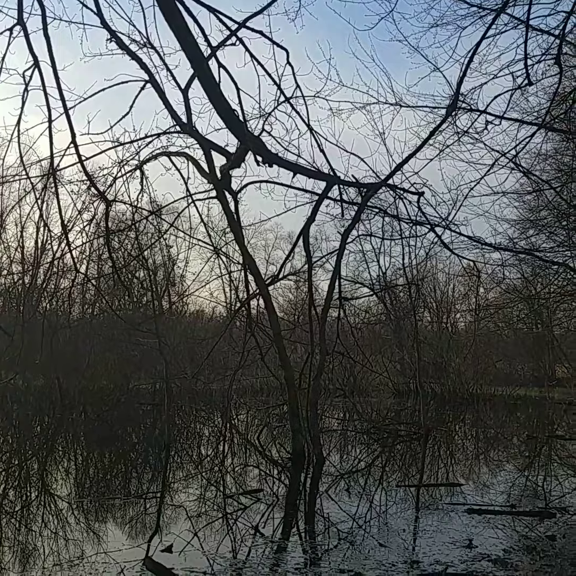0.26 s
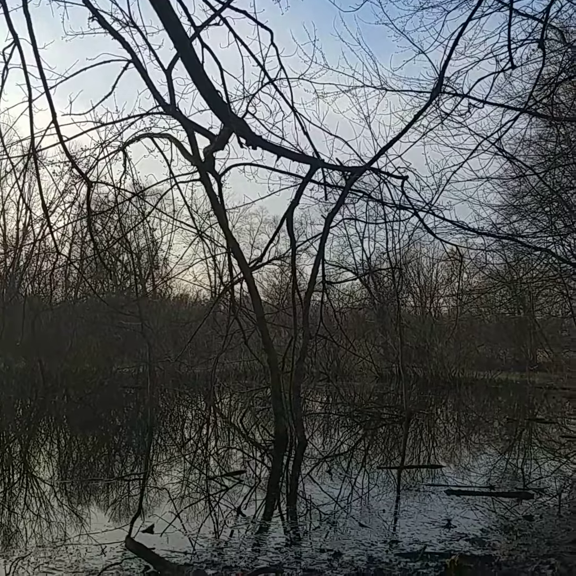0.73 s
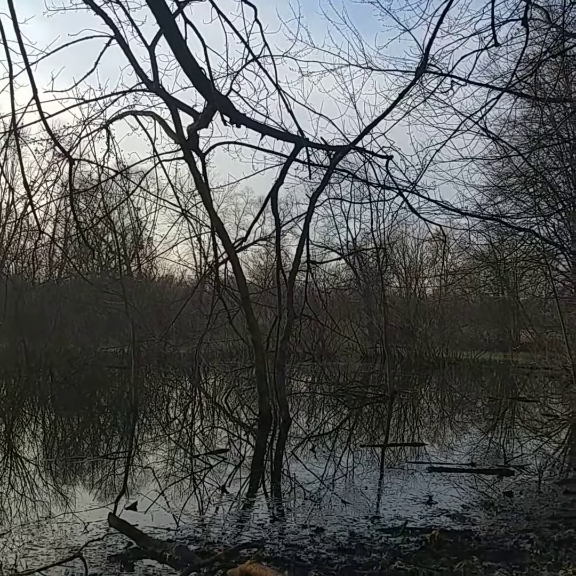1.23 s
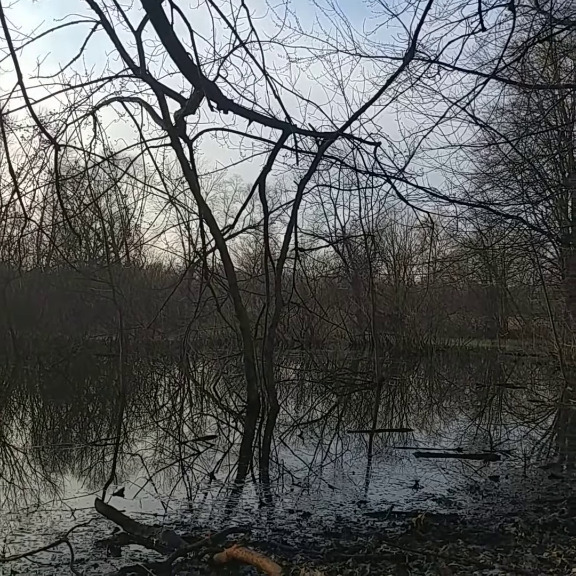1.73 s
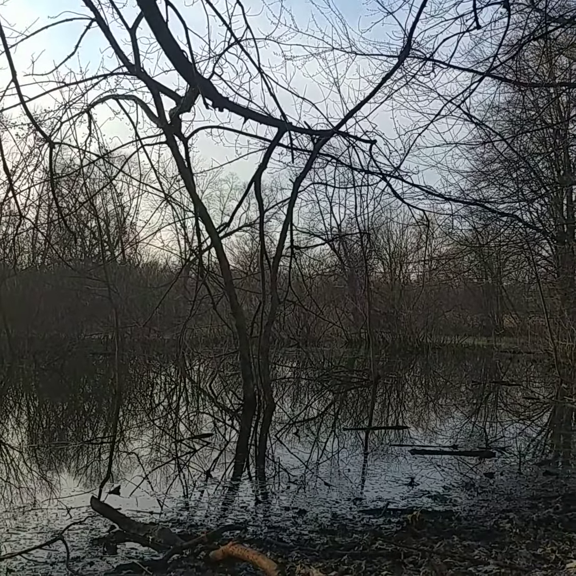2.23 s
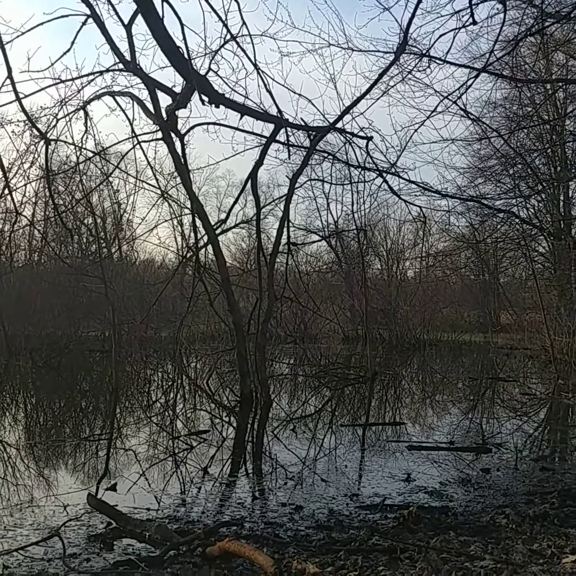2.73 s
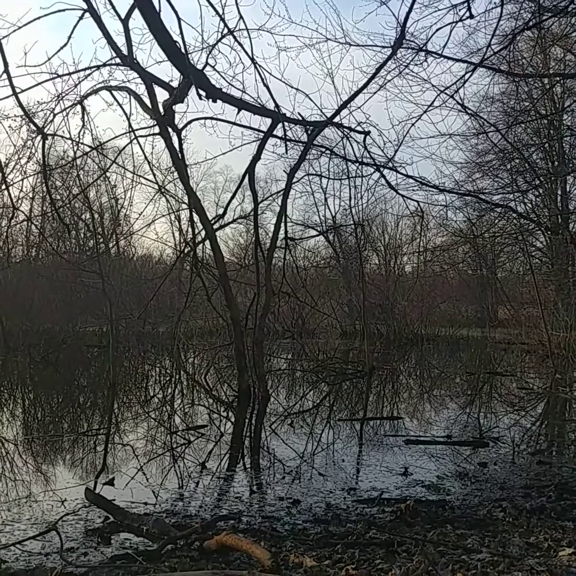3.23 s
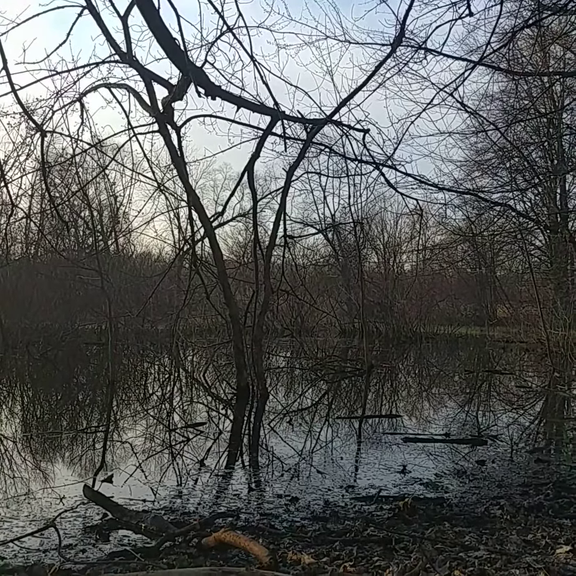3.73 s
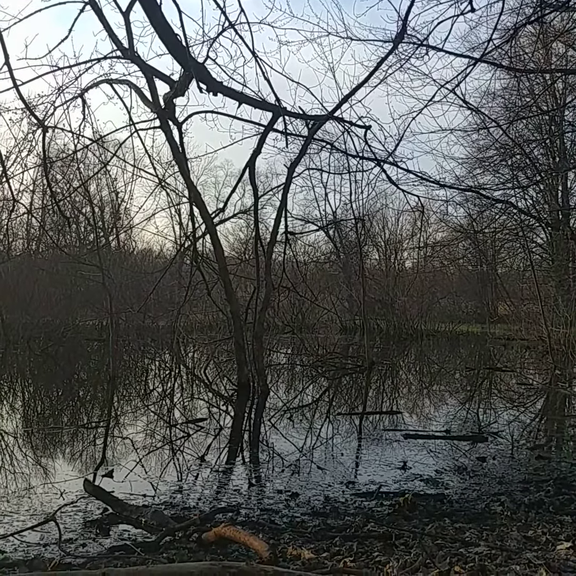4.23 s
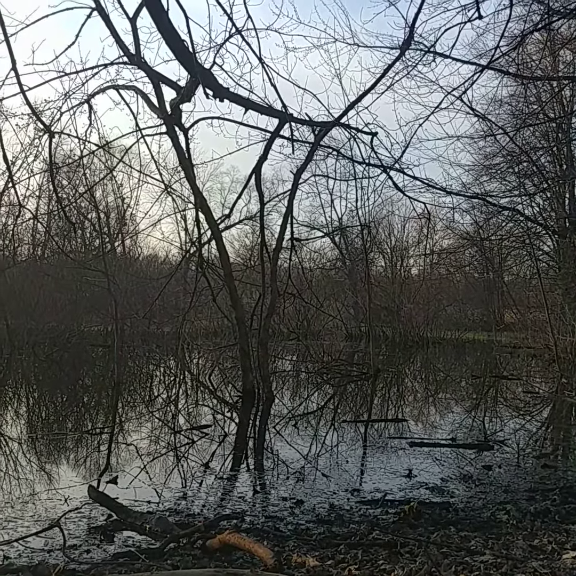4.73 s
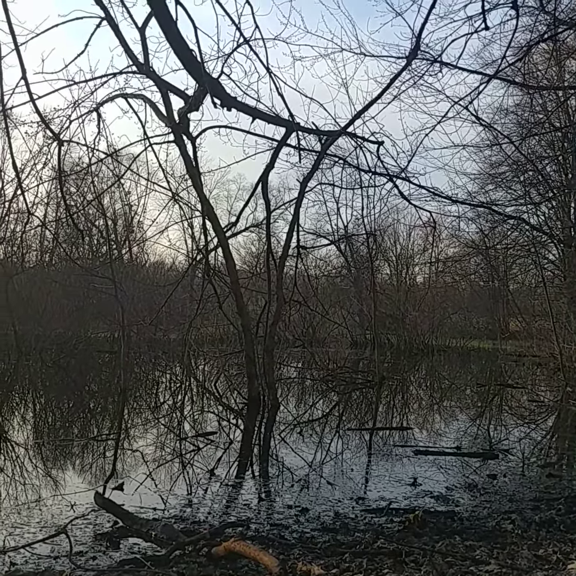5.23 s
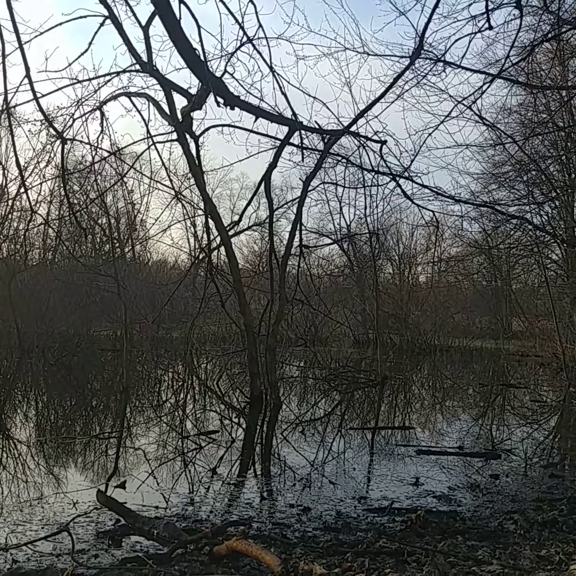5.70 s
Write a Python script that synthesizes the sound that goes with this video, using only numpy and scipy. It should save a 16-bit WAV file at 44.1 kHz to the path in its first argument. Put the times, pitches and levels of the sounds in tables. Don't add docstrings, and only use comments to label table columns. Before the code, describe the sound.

Overlapping short frog quacks fill a woodland pond at dusk while a smaller frog creaks and a marsh bird gurgles into a buzzing trill.

```python
import sys
import numpy as np
from scipy import signal
from scipy.fft import rfft, irfft
from scipy.io import wavfile
from scipy.ndimage import uniform_filter1d

SR = 44100
rng = np.random.default_rng(int(sys.argv[2]) if len(sys.argv) > 2 else 0)


def wav_record(signal):
    frames = np.transpose(np.atleast_2d(signal))
    bounded = np.clip(frames, -1, 1)
    quanta = np.round(bounded * 32767).astype(np.int16)
    wavfile.write(sys.argv[1], SR, quanta)


def invert_db(level):
    return 10 ** (np.asarray(level, dtype=float) / 20)


N = 262836
T = np.arange(N) / SR


def unit(x):
    return x / np.sqrt(np.mean(x ** 2))


def ring(x, hz, width_hz):
    return signal.lfilter(*signal.iirpeak(hz, hz / width_hz, fs=SR), x)


def steep(x, hz, width_hz):
    return ring(ring(ring(x, hz, width_hz), hz, 2 * width_hz), hz, 2 * width_hz)


def add(out, x, start_s, pan_db, lag=1):
    i = max(int(start_s * SR), 0)
    out[0, i + lag:i + lag + len(x)] += x[:N - i - lag] * invert_db(pan_db / 2)
    out[1, i:i + len(x)] += x[:N - i] * invert_db(-pan_db / 2)


def two_ports(mid, side, alike):
    alike = np.clip(alike, 0, 1)
    return np.sqrt(1 + alike) * mid + np.sqrt(1 - alike) * side * np.array([[1], [-1]])


def coloured(points, alike):
    hz, db = np.transpose(points)
    f = np.maximum(np.fft.rfftfreq(N, 1 / SR), 1)
    gain = invert_db(np.interp(np.log(f), np.log(hz), db))
    mid, side = irfft(rfft(rng.standard_normal((2, N))) * gain, N)
    return unit(two_ports(mid, side, alike))


def walk(rate_hz):
    k = int(SR / rate_hz)
    held = np.repeat(rng.standard_normal(N // k + 1), k)
    return unit(uniform_filter1d(uniform_filter1d(held, k), k)[:N])


def wood(x, t60_s, alike, gap_ms=4):
    t = np.arange(SR) / SR
    clumps = invert_db(2.84 * rng.standard_normal(SR // 100).repeat(100))
    mid, side = rng.standard_normal((2, SR)) * clumps
    cloud = two_ports(mid, side, alike)
    cloud = cloud * invert_db(-60 * t / t60_s) * (1 - np.exp(-(t * 1000 / gap_ms) ** 2))
    cloud = cloud / np.sqrt(np.sum(cloud ** 2) / 2)
    return irfft(rfft(x) * rfft(cloud, N), N)


def distance():
    # start_s, level_db
    engine_load = [(0.0, -59.5), (0.03, -58), (0.98, -49.5), (1.09, -55.5), (1.13, -51), (3.34, -49.5),
                   (4.18, -44), (4.23, -51), (4.45, -42), (5.29, -45.5), (5.66, -42.5), (5.96, -47.5)]
    # hz, level_db
    road_spectrum = [(30, -30), (50, -15), (70, 2.5), (120, -3.5), (200, -10.5), (300, -18.5), (500, -27),
                     (900, -15), (2000, -56)]
    # hz, level_db
    air_spectrum = [(1500, -13.5), (2500, 8), (4000, -4.5), (6000, -10.5), (8000, -17), (10000, -23),
                    (13000, -17), (15600, -13)]
    load_db = np.interp(T, *np.transpose(engine_load))
    phase = 2 * np.pi * 90.9 * T
    octave = invert_db(-12 + 1.16 * walk(2.91)) * np.sin(2 * phase + 1)
    hum = invert_db(load_db - 0.5) * (np.sin(phase) + octave)
    road_db = -49.5 + 0.43 * (load_db - load_db.mean()) + walk(3.77)
    road = coloured(road_spectrum, 0.89) * invert_db(road_db)
    hiss = invert_db(-65.5 + 0.7 * walk(6)) * coloured(air_spectrum, 0)
    port_gain = invert_db(np.array([[1.5], [-1.5]]))
    return (np.sqrt(2) * hum + road) * port_gain + hiss


def note(length_ms, first_hz, last_hz):
    u = np.arange(int(length_ms / 1000 * SR)) / (length_ms / 1000 * SR)
    span_hz = last_hz - first_hz
    bend = 1 - np.exp(-u / .22) if last_hz > first_hz else u ** 1.6
    bend = bend + rng.normal(0, 25) * np.sin(2 * np.pi * u * length_ms / 40) / span_hz
    phase = 2 * np.pi * np.cumsum(first_hz + span_hz * bend) / SR
    return np.sqrt(2) * np.sqrt(np.sin(np.pi * u)) * np.sin(phase)


def chips(deep):
    # start_s, top_hz, level_db
    chip_calls = [
        (-.006, 7500, -76),
        (1.296, 7300, -65),
        (2.539, 7600, -60.5),
        (3.338, 7270, -56),
        (4.359, 7500, -51.5),
        (5.182, 7300, -53),
    ]
    for s, hz, db in chip_calls:
        add(deep, invert_db(db) * note(24, .79 * hz, hz), s, 11, lag=2)


def droops(open_air):
    # start_s, level_db
    droop_calls = [
        (1.962, -69),
        (2.096, -62),
        (2.249, -65),
        (2.405, -67),
        (2.565, -67),
        (2.725, -74),
        (2.885, -75),
    ]
    for s, db in droop_calls:
        hz = 5140 - 300 * (s - droop_calls[0][0])
        add(open_air, invert_db(db) * note(26, hz, .87 * hz), s, 3.5, lag=2)


def whistles(deep, open_air):
    # start_s, length_ms, first_hz, last_hz, level_db
    whistle_calls = [
        (4.497, 25, 3800, 3750, -70),
        (4.515, 120, 6430, 6220, -66),
        (4.565, 30, 3400, 3380, -71),
        (4.620, 9, 3700, 5200, -63),
        (4.810, 20, 3850, 3500, -61),
        (4.900, 14, 3400, 3390, -54),
        (5.640, 70, 3700, 3600, -71),
        (5.845, 40, 6900, 6250, -65),
        (2.135, 45, 2500, 3050, -61),
        (2.29, 35, 2600, 3050, -63),
    ]
    for s, ms, first_hz, last_hz, db in whistle_calls:
        place = deep if last_hz > first_hz else open_air
        add(place, invert_db(db) * note(ms, first_hz, last_hz), s, 3.5, lag=2)


def scold(deep):
    # hz, width_hz, level_db
    tract = [(3730, 800, -6), (4800, 750, 3), (5400, 400, -6), (6450, 810, -12.5), (7840, 930, -16.5)]
    u = np.arange(int(0.049 * SR)) / SR
    pulsing = .5 + np.cos(np.pi * 190 * u) ** 4
    rasp = rng.standard_normal(len(u)) * pulsing * np.sin(np.pi * u / u[-1]) ** 0.36
    voice = sum(invert_db(db) * unit(steep(rasp, hz, width_hz)) for hz, width_hz, db in tract)
    add(deep, invert_db(-44.5) * unit(voice), 1.008, 5, lag=2)


def drips():
    # start_s, peak_db
    drip_ticks = [
        (1.769, -49),
        (2.534, -60),
        (2.618, -56),
        (2.642, -55),
        (2.684, -58),
        (2.783, -53),
    ]
    out = np.zeros((2, N))
    tick = steep(np.eye(1, SR // 100)[0], 7600, 980)
    for s, db in drip_ticks:
        add(out, invert_db(db) * tick / tick.max(), s, 2.5)
    return out


def small_birds():
    deep, open_air = np.zeros((2, 2, N))
    chips(deep)
    droops(open_air)
    whistles(deep, open_air)
    scold(deep)
    echoes = wood(invert_db(-2.5) * deep + invert_db(-5.5) * open_air, .47, .1, gap_ms=8)
    return deep + open_air + drips() + echoes


def syrinx(song, swing_hz, jitter_hz, sag, fade_db):
    s, length_s, hz, db, buzz = np.transpose(song)
    now = np.clip(np.searchsorted(s, T) - 1, 0, None)
    part = (T - s[now]) / length_s[now]
    done = np.clip(part, 0, 1)
    edge = int(0.0095 * SR)
    on = uniform_filter1d(((part > 0) & (part < 1)) * invert_db(db[now] - fade_db * done), edge)
    hz = uniform_filter1d(hz[now] * (1 - sag * done), edge)
    buzz = np.clip(buzz, 0, 1)[now]
    trill_hz = 40.27 * (1 + 0.03025 * walk(6))
    beat = 2 * np.pi * np.cumsum(trill_hz) / SR
    throb = 1 + buzz * (.7 * np.cos(beat) + .45 * np.cos(2 * beat + .8) + .45 * walk(250))
    pitch_hz = hz + buzz * (swing_hz * np.sin(2 * beat) + jitter_hz * walk(500))
    return np.sqrt(2) * on * throb * np.sin(2 * np.pi * np.cumsum(pitch_hz) / SR)


def marsh_bird():
    # start_s, length_s, pitch_hz, level_db, buzz_0_to_1
    upper_song = [
        (4.662, 0.034, 5080, -58, 0.3),
        (4.702, 0.052, 5350, -57.5, 0.88),
        (4.77, 0.0546, 5400, -62, .1),
        (4.828, .07, 5680, -58.5, .25),
        (4.902, 0.048, 5380, -47.5, .45),
        (4.962, .04, 5440, -52.5, 0.9),
        (5.03, .05, 5230, -48.5, .4),
        (5.085, .47, 5343, -46, .85),
    ]
    # start_s, length_s, pitch_hz, level_db, buzz_0_to_1
    lower_song = [
        (4.705, 0.086, 2988, -56, 0.98),
        (4.8, 0.105, 3060, -55.5, 0.98),
        (4.93, 0.095, 2971, -44, 0.97),
        (5.012, 0.047, 3317, -46, 0.73),
        (5.08, 0.49, 2820, -45, .45),
    ]
    out = np.zeros((2, N))
    lower = syrinx(lower_song, swing_hz=130, jitter_hz=230, sag=0, fade_db=5)
    rasp = steep(lower * rng.standard_normal(N), 4000, 1500)
    upper = syrinx(upper_song, swing_hz=90, jitter_hz=95, sag=.03, fade_db=6)
    add(out, invert_db(1.5) * lower + invert_db(-3.5) * upper + invert_db(-0.5) * rasp, 0, 3, lag=2)
    return out + invert_db(-2.5) * wood(out, 0.5, 0.25, gap_ms=7)


def creaker():
    # start_s, ticks, first_gap_ms, gap_growth_ms_per_tick
    trills = [
        (.7454, 14, 34.64, .68),
        (2.382, 14, 33.5, .69),
        (3.306, 7, 39, .4),
    ]
    # first_hz, last_hz, first_db, last_db
    trill_tones = [
        (2612, 2990, -54, -47),
        (2620, 3000, -53, -47),
        (2850, 2940, -54, -54),
    ]
    out, click = np.zeros((2, N)), np.zeros(SR // 20)
    click[[0, SR // 160]] = 1, .6
    for (s, ticks, gap_ms, slowing_ms), (hz0, hz1, db0, db1) in zip(trills, trill_tones):
        for k, (hz, db) in enumerate(np.linspace((hz0, db0), (hz1, db1), ticks)):
            tick = steep(click, hz * (1 + .01 * rng.standard_normal()), 180)
            tick = invert_db(db + 1.3 * rng.standard_normal()) * tick / tick.max()
            add(out, tick, s + (gap_ms * k + slowing_ms * k * k / 2) / 1000, 4)
    return out + invert_db(-6) * wood(out, .5, .3)


def quack(length_ms, hz, bright_db, chance):
    rate_hz = 350 * (1 + .1 * chance[0])
    at_s = np.cumsum((1 + 0.2 * chance[4:34]) / rate_hz)
    part = at_s / (length_ms / 1000 + 0.0084)
    size = np.sin(np.pi * np.clip(part, 0, 1) ** 0.86) ** 0.8 * invert_db(3.0 * chance[34:])
    clicks = np.zeros(int((length_ms + 40) / 1000 * SR))
    clicks[(at_s[part < 1] * SR).astype(int)] = size[part < 1]
    push = np.convolve(clicks, np.hanning(SR // 2200), "same")
    parts = [(steep(push, hz, 400), 0),
             (steep(push, 900 * (1 + .06 * chance[1]), 400), -9.5 + 1.5 * chance[2]),
             (steep(push, 1270 * (1 + 0.11 * chance[2]), 233), -9),
             (steep(clicks, 3100 * (1 + 0.012 * chance[61]), 710), bright_db + 6.0),
             (steep(clicks, 3.31 * hz, 600), bright_db - 9.5 + 2 * chance[60])]
    loud = np.sqrt(length_ms / 1000 * SR)
    return sum(invert_db(db) * loud * p / np.sqrt(np.sum(p ** 2)) for p, db in parts)


def chances(calls):
    return np.clip(rng.standard_normal((calls, 64)), -2, 2)


def far_crowd():
    # start_s, level_db
    crowd_level = [
        (0.0, -44),
        (0.36, -43),
        (1.24, -42),
        (2.2, -44.5),
        (3.37, -48),
        (4.3, -47.5),
        (5.56, -41.5),
        (5.96, -44.5),
    ]
    far = np.zeros((2, N))
    for s, c in zip(rng.uniform(0, N / SR, size=260), chances(260)):
        call = quack(33.4, 1660 * (1 + 0.15 * c[62]), -34.5, c)
        add(far, invert_db(4.77 * c[63]) * call, s, 4.2 + 1.6 * c[3])
    level_db = np.interp(T, *np.transpose(crowd_level)) - 2.0
    return unit(invert_db(-1.9) * far + wood(far, 1.0, 0.2)) * invert_db(level_db)


def near_frogs():
    # start_s, length_ms, level_db
    big_frog = [(.092, 38, -38.5), (.617, 28, -44.5), (.903, 49, -44.5), (1.002, 43, -43),
                (1.308, 43, -38.5), (1.668, 32, -38), (1.726, 31, -39), (1.806, 31, -39), (1.946, 45, -40),
                (2.041, 20, -40), (2.348, 33, -41.5), (2.48, 28, -50), (3.39, 25, -49), (3.701, 33, -46),
                (3.895, 36, -45.5), (4.08, 16, -58), (4.545, 21, -49), (4.762, 18, -46.5),
                (5.09, 45, -43.5), (5.143, 52, -41.5), (5.434, 28, -41.5)]
    second_frog = [(.023, 34, -43.5), (.163, 24, -38.5), (0.227, 30, -35.5), (.278, 42, -38.5),
                   (.393, 55, -40), (0.441, 39, -38.5), (.505, 19, -40), (.679, 44, -35.5),
                   (.866, 45, -39.5), (.939, 41, -38), (1.036, 24, -42), (1.131, 96, -40), (1.393, 74, -39),
                   (1.571, 41, -44), (1.627, 22, -36.5), (2.392, 49, -44.5), (2.618, 29, -41),
                   (2.985, 50, -47), (3.062, 59, -46.5), (3.815, 19.5, -40.5), (3.947, 20, -40.5),
                   (5.47, 43, -45), (5.806, 47, -41.5), (5.908, 43, -42)]
    third_frog = [(.555, 31, -37), (.597, 20, -42), (.745, 54, -40.5), (1.183, 27, -38), (1.358, 44, -39.5),
                  (1.465, 19.5, -39), (1.894, 22, -41.5), (1.976, 69, -40), (2.679, 64, -49.5),
                  (2.877, 28, -45), (2.942, 58, -45), (3.036, 19, -45), (3.52, 38, -41), (3.63, 40, -46),
                  (3.666, 34, -42.5), (3.731, 42, -41.5), (4.15, 24, -41), (4.177, 50, -45.5),
                  (4.301, 65, -45), (4.421, 44, -40), (4.591, 41, -45.5), (4.658, 30, -37.5),
                  (4.807, 39, -44), (4.888, 26, -37), (4.985, 46, -37), (5.2, 41, -38), (5.329, 37, -36.5),
                  (5.596, 44, -42.5)]
    small_frog = [(.333, 70, -47), (1.095, 43, -39.5), (1.253, 34, -43), (1.483, 30, -39),
                  (1.858, 36, -44.5), (2.104, 43, -43), (2.18, 22, -39.5), (2.263, 38, -44),
                  (2.302, 46, -41), (2.448, 26, -36.5), (2.798, 42, -41), (3.216, 37, -40),
                  (3.243, 39, -44), (3.283, 49, -41), (4.049, 23.4, -41), (4.371, 37, -36.5),
                  (4.695, 42, -40), (4.917, 37, -39.5), (5.237, 19, -38.5), (5.264, 29, -39.5),
                  (5.304, 27, -32.5), (5.521, 40, -40), (5.644, 32, -41), (5.785, 24, -37.5),
                  (5.852, 27.6, -32)]
    # sac_hz, overtone_db
    sacs = [
        (1500, -37.5),
        (1610, -33),
        (1740, -28.5),
        (1890, -26),
    ]
    near = np.zeros((2, N))
    for calls, (sac_hz, overtone_db) in zip((big_frog, second_frog, third_frog, small_frog), sacs):
        for (s, ms, db), c in zip(calls, chances(30)):
            bright_db = overtone_db + 0.54 * (db + 40.5) + 2 * c[63]
            call = quack(ms, sac_hz * (1 + 0.022 * c[62]), bright_db, c)
            add(near, invert_db(db - 3.0) * call, s - .005, 4.9 + 0.29 * c[3])
    return near + invert_db(-8) * wood(near, .25, .25)


def scene():
    return distance() + small_birds() + marsh_bird() + creaker() + far_crowd() + near_frogs()


def band_limit(x):
    return signal.sosfilt(signal.butter(12, 15730, fs=SR, output="sos"), x)


def record(dry):
    top_cut = signal.ellip(10, .2, 80, 15750, fs=SR, output="sos")
    mix = signal.sosfilt(top_cut, dry)
    return band_limit(mix)


dry = scene()
out = record(dry)
wav_record(out)
```